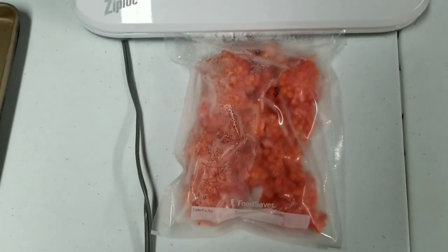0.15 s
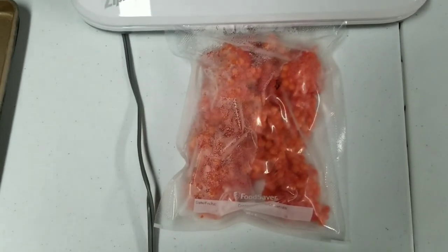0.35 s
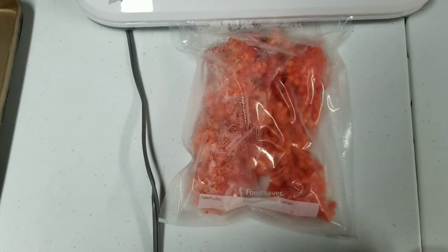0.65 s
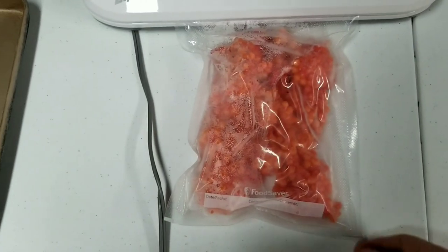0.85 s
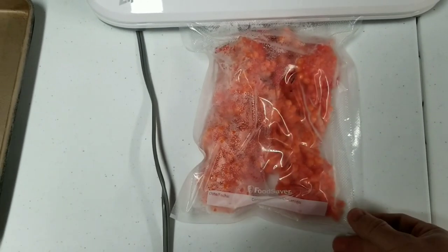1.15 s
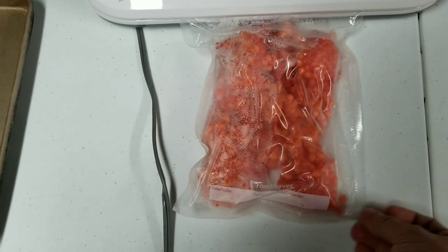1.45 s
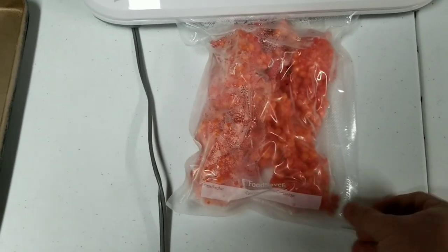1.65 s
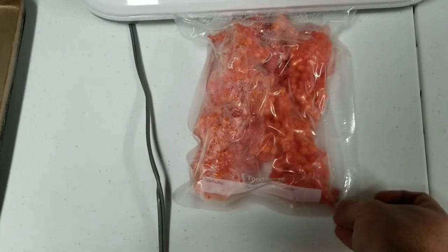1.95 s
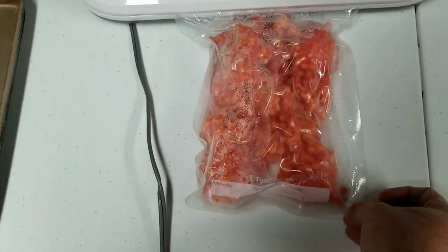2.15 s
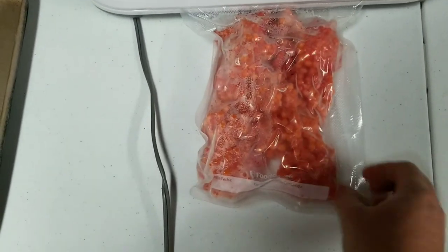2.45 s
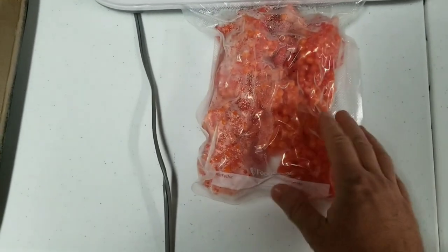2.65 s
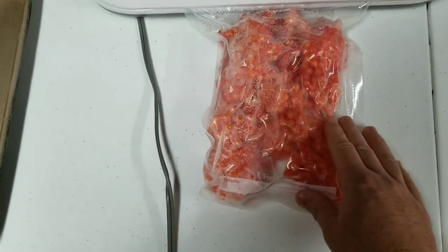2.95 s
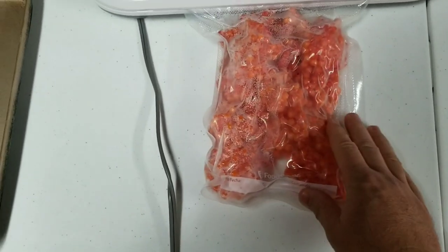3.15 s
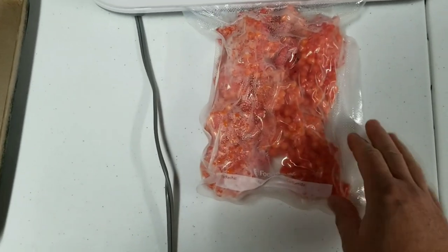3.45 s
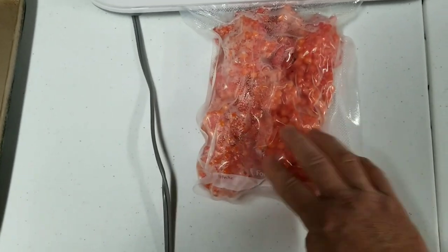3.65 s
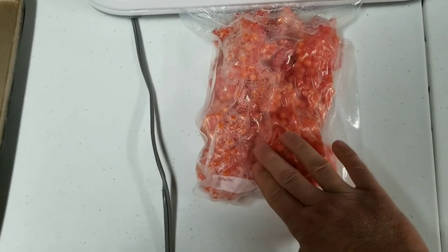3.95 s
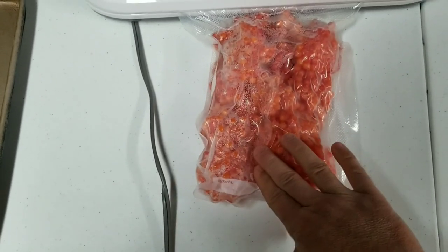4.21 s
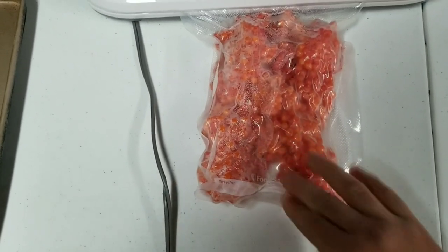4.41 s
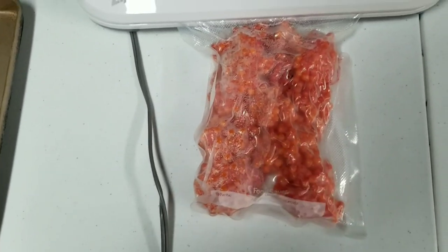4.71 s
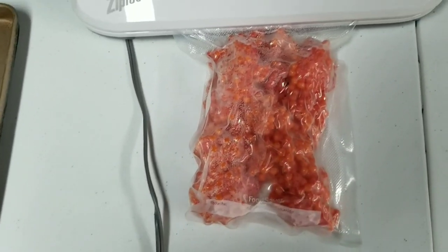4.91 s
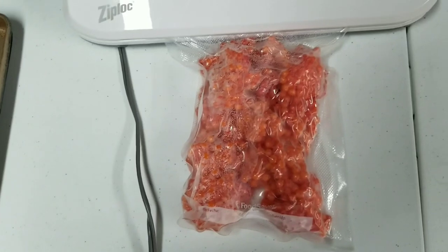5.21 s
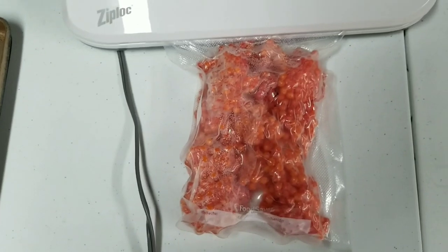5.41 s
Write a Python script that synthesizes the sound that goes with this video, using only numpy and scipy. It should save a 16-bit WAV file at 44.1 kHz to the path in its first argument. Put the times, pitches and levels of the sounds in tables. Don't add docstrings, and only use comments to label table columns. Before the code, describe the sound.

A small vacuum pump runs from start to finish on a kitchen counter, heard very close in stereo with slight short room echo. Its low buzzing hum, about 49 strokes per second, carries housing thump, valve knock, rattling panels and rough pulsing hiss. From 0.2 to 1.7 s the plastic bag gives loud dry snaps, strongest around 0.4-0.5 and 0.94 s, with low knocks of shifting contents near 0.46-0.64 s. The motor fades from about 1.3 s, quietest at 2-2.8 s, while fine crackles and ticks continue; a sharp snap comes at 3.07 s. It then strengthens, more rattly and laboured, sinking slightly in pitch until about 4.7 s. Snaps cluster at 4.34-4.7 s with a firm knock; another sharp snap at 5.12 s brings a tiny puff of air. The level dips briefly after big snaps. Pitch recovers a little and the hum softens, ending still running at 5.6 s.

```python
import sys
import numpy as np
from scipy import signal
from scipy.fft import rfft, irfft, next_fast_len
from scipy.io import wavfile
from scipy.ndimage import uniform_filter1d

SR = 44100
rng = np.random.default_rng(int(sys.argv[2]) if len(sys.argv) > 2 else 0)


def convert_level_to_amplitude(level_db):
    exponent = np.asarray(level_db, float) / 20
    return 10 ** exponent


def master(y):
    cut = np.clip(np.atleast_2d(y).T, -1, 1)
    pcm = np.round(cut * 32767)
    wavfile.write(sys.argv[1], SR, pcm.astype(np.int16))


N = 245637

# hz, likeness
LIKENESS = [(60, 1), (180, 0.29), (550, 0.02), (1650, 0.086), (4970, 0.01), (15000, 0.033)]
# hz, level_db
LEAN = [(60, -.2), (170, -.8), (350, -.7), (700, -1.5), (1400, -4.5), (2800, -3), (5600, -11), (9800, -4.5),
        (14000, -7)]
PORT_DB = -66
KITCHEN_T60_S, WALL_CUT_HZ = .3, 4000
STEADY_TOP_HZ, CRACK_TOP_HZ = 16050, 16900

# start_s, depth_db
DUCKS = [
    (.495, 4.5),
    (1.065, 1.5),
    (1.35, 1),
    (1.44, -1),
    (1.665, 1),
    (1.73, 1),
    (4.378, 2.5),
    (4.7, 2),
    (5.122, 4),
]
DUCK_S, RECOVER_S = 0.00099, 0.52

# time_s, strokes_per_s
SPEED = [(0, 49.16), (.4, 49.22), (.84, 49.14), (1.4, 49.17), (1.67, 49.1), (1.95, 48.96), (2.51, 48.48),
         (3.07, 47.97), (3.91, 47.285), (4.19, 46.95), (4.46, 46.18), (4.74, 46.01), (5.02, 46.01),
         (5.3, 46.4), (5.57, 46.4)]
# time_s, level_db
EFFORT = [(0, -23.5), (.4, -22.5), (1.3, -27), (2.0, -32.5), (2.81, -33), (2.89, -31), (4.0, -27),
          (5.05, -26.5), (5.57, -30.5)]
# time_s, grip_db
SEAL = [(0, 0), (.6, 1), (1.8, 3.5), (2.8, 3.5), (3.8, 3.5), (4.2, 2.5), (4.6, 3.5), (5.1, 2.5), (5.57, 2)]
LIGHT_DB = [-24, -30, 3.5, -6.5, 3, -5.5, -14, -12.5, -8, -7.5, -19.5, -14, -9, -18, -13, -26.5, -18, -21,
            -17, -16.5, -10.5, -13, -15.5, -9, -8, -8, -15, -22, -18, -22.5]
PULLING_DB = [-20, -19, 4.5, -19.5, 3, -8, -10, -16.5, -16.5, -21.5, -16, -19.5, -16.5, -11.5, -9, -29, -22,
              -16, -18, -16.5, -23, -8, -12.5, -11.5, -5.5, -12.5, -12.5, -12, -22, -24]
GRIPPING_DB = [-29, -22, 0.5, -18.5, 0.5, -10.5, -6, -31.5, -14, -25.5, -19, -10, -11.5, -24, -6, -23, -24,
               -17.5, -17, -26, -13, -16, -12, -15, -9.5, -11.5, -13.5, -17, -20, -31]
TIGHT_DB = [-22, -18, 3, -8.5, -1.5, -6.5, -5, -22, -6, -15.5, -19.5, -2.5, -4.5, -30, -15, -14, -28, -9.5,
            -10, -11, -10, -1, -3, -11, 0.5, -1, -1, -17, -12, -30]
STRAINING_DB = [-23.5, -19, 2, -3.5, 2, -7, -2.5, -17, -11, -10, -22, -21.5, -10, -36, -15.5, -19, -22, -15,
                -9, -7.5, -18, -5, -10, -10, -10, -4, -16, -13, -18, -24]
LABOURING_DB = [-21.5, -12.5, 5, 3, 0.5, -2, 0, -12.5, -8.5, -12.5, -22, -6, -16, -20.5, -14, -14, -20.5,
                -11, -4, 4, 3.5, -5, 5.5, -5, -3, 10, 4.5, 3, -5.5, -9.5]
LOADED_DB = [-19, -20, 1, 4.5, -1.5, -19, -6.5, -16, -30, -12, -19, -17.5, -20, -11, -21, -13, -7.5, -15,
             -13.5, -11, -4, -4.5, -7.5, -13, -8, -17, -9, -12, -8.5, -10]
SETTLED_DB = [-18, -26, -2, 3, 1.5, -14, -8, -21, -24, -15.5, -18, -24, -15, -11, -18, -22.5, -14, -20,
              -19.5, -13, -8, -7.5, -15, -11, -7, -7, -9.5, -24, -23, -16]
STAGE_S = [.7, 2.3, 2.85, 3.4, 3.85, 4.25, 4.7, 5.4]
THUMP_LAG_CYCLES = [.05, .01, .01, .01, -.03, -.06, -.07, -.07]
LID_LAG_CYCLES = [0.1214, 0.11, 0.11, 0.065, 0.06, 0.007, 0.0034, 0.005]
RETURN_TURN_CYCLES = [.6, .5, .2, 0, 0, 0, 0, 0]
SWELL_LAG_CYCLES = [0, .17, .1, .03, .06, .08, 0, 0]
# ring_hz, width_hz, level_db at four loads
PANELS = [(1526, 134, -26, -8, -3, -8), (1760, 69, -11, -13, -3.5, -4), (1924, 41, -16, -13, -5.5, -8),
          (2080, 20, -12, -18, -8, -12.5), (2308, 107, -6, -30, -7.5, -2), (2805, 105, -13.5, -4, 0, -6)]
PANEL_S = [.8, 2.4, 3.8, 4.8]
RUMBLE_DB = -29.5

# hz, level_db_per_hz
AIR = [(240, -42), (400, -8), (445, -16), (488, -11), (725, -8.5), (807, -15), (871, -15.5), (1220, -1),
       (1480, -6.5), (2770, -8.5), (3760, -13), (7470, -12), (9250, -19.5), (15300, -13.5)]
HISS_UNDER_DB = -11
LOW_AIR_LOSS_DB, LOW_AIR_FADE_S = 8, 4.5
# start_s, level_db, decay_s
PUFFS = [
    (5.132, -25.5, 0.039),
]
WHISTLE_HZ, WHISTLE_WANDER_HZ, WHISTLE_DB = 2845, 15, -15

# hz, level_db_per_hz
FILM = [(900, -35), (1500, -30), (2300, 6.5), (3700, 5), (5500, 6), (7450, 10), (9300, -9), (12000, -3.5),
        (15000, -1), (16500, -18)]
# time_s, busy_db
CRACKLE = [(0, 6.5), (.7, 0.5), (1.3, 2.5), (1.8, -14), (2.3, 1.5), (3.3, 1.5), (4.0, -2.5), (4.8, 0.5),
           (5.25, -23.5), (5.57, 6)]
GRAINS_PER_S, CRACKLE_DB, RATE_FOLLOWS = 420, -45.5, 0.37
# start_s, peak_db, ring_hz, left_minus_right_db
SNAPS = [(.1984, -9.5, 2440, -11), (.4018, -4, 7500, -19), (.4584, -4.5, 2200, -17),
         (.5039, -4.5, 5240, -14), (.9401, -3, 4930, -14.5), (1.0635, -7.5, 3470, -17),
         (1.3478, -6, 5300, -11), (1.3951, -7, 8360, -13), (1.4432, -4.5, 4500, -10),
         (1.716, -8, 6400, -17), (2.12, -10.5, 6040, -34), (2.3955, -9.5, 4500, -9),
         (2.4495, -10, 5800, -17), (2.568, -7.5, 5530, -15), (2.7867, -7, 6160, -14),
         (2.9544, -8.5, 5400, -15), (2.9895, -8.5, 7600, -21), (3.0671, -3.5, 7900, -17),
         (3.192, -7.5, 2430, -27), (3.2809, -11, 8100, -13), (3.3312, -8.5, 4900, -16),
         (3.8591, -9.5, 6750, -17), (4.3452, -6, 3260, -8), (4.375, -7.5, 6300, -21),
         (4.577, -7.5, 3150, -16), (4.6406, -7, 5800, -18), (4.7042, -7, 7550, -14),
         (5.0466, -8.5, 6600, -21), (5.1235, -3.5, 5600, -25), (5.4121, -10, 6200, -17)]
# start_s, peak_db, ring_hz
CREASES = [(0.491, -14, 1830), (.64, -8.5, 5240), (1.0254, -12, 2090), (1.1595, -13, 4930),
           (1.25, -12, 6200), (1.287, -13, 5700), (1.499, -18, 6440), (1.6, -13, 7340),
           (1.6619, -8.5, 2080), (2.262, -12, 2330), (1.9865, -14, 6400), (2.054, -15.5, 4860),
           (2.253, -11, 6500), (2.51, -21, 1760), (2.638, -12, 1670), (2.717, -18, 5540),
           (3.009, -14, 5530), (3.0203, -11.5, 6030), (3.042, -12, 6660), (4.336, -14, 5500),
           (4.3737, -6, 5100), (3.2112, -9.5, 7400), (3.455, -11, 7250), (3.6433, -16, 7700),
           (3.681, -14.5, 2170), (3.917, -9, 6400), (4.0177, -18, 2080), (4.4603, -13, 2700),
           (5.028, -12, 3200), (5.312, -16, 7660), (5.354, -14.5, 7060)]
# start_s, peak_db, ring_hz
MORE_CREASES = [(0.168, -19, 4900), (0.41, -18, 2400), (0.5222, -15, 7500), (0.5923, -9.5, 2400),
                (0.7132, -22, 5800), (0.7288, -16, 4700), (0.7896, -29, 7700), (0.8077, -19, 7300),
                (0.8735, -19, 6100), (0.903, -18.5, 6600), (0.911, -18, 2590), (0.9482, -17, 5700),
                (1.021, -14.5, 5800), (1.1413, -29, 6500), (1.174, -24, 5500), (1.2085, -16, 7060),
                (1.261, -31, 6500), (1.272, -20, 1800), (1.3415, -14, 5000), (1.3807, -19, 6900),
                (1.5383, -23, 6600), (1.727, -12, 5240), (1.7834, -19.5, 4700), (1.802, -21, 1830),
                (1.9147, -31, 6200), (1.919, -20, 5240), (1.956, -27, 7100), (2.1305, -16.5, 4520),
                (2.18, -19, 5000), (2.2082, -23, 5000), (2.2123, -29, 4800), (2.28, -20, 1900),
                (2.327, -23, 5600), (2.359, -26, 7700), (2.381, -31, 2900), (2.4274, -25, 5000),
                (2.4346, -26, 3100), (2.4916, -21, 5700), (2.5191, -21, 2900), (2.5355, -20, 4700),
                (2.593, -26, 5700), (2.628, -19, 7500), (2.65, -19.5, 2600), (2.6555, -18.5, 6900),
                (2.7002, -26, 6900), (2.7262, -16, 7000), (2.734, -18.5, 4900), (2.7393, -18, 2300),
                (2.806, -16, 6200), (2.8259, -22, 5900), (2.846, -22, 6100), (2.898, -19, 7400),
                (2.9046, -20, 7000), (2.9095, -18, 5800), (2.9626, -16, 5900), (2.9689, -26, 7300),
                (3.004, -29, 7100), (3.0601, -24, 5600), (3.071, -21.0, 6100), (3.0762, -17, 2800),
                (3.0853, -29, 7100), (3.132, -12.5, 4800), (3.1397, -19, 5000), (3.166, -18, 5200),
                   (3.18, -15, 2600), (3.2057, -20, 4800), (3.2163, -24.0, 6700), (3.222, -19, 3100),
                   (3.2322, -24.0, 5800), (3.2719, -30, 6500), (3.3079, -18, 5400), (3.316, -20, 5100),
                   (3.3247, -25, 1900), (3.3347, -24, 6600), (3.3757, -19, 7400), (3.3903, -19, 7400),
                   (3.4111, -14, 7100), (3.477, -17, 7000), (3.4927, -16, 6600), (3.5413, -18, 7100),
                   (3.5564, -23, 5300), (3.66, -14, 7100), (3.665, -14, 2000), (3.675, -15, 1900),
                   (3.6987, -14, 7600), (3.734, -22.0, 7700), (3.7794, -19, 5300), (3.795, -17, 7500),
                   (3.8085, -22, 2980), (3.849, -23, 7600), (3.9279, -18, 5600), (3.9621, -17, 7940),
                   (4.0316, -16, 5500), (4.0404, -15.5, 7600), (4.134, -18.0, 6900), (4.1644, -14, 7500),
                   (4.2413, -19, 5500), (4.3519, -10.5, 5100), (4.4757, -11.5, 3930), (4.4873, -32, 5600),
                   (4.5413, -14.5, 7500), (4.601, -20, 6200), (4.607, -16, 6600), (4.6575, -19, 7000),
                   (4.749, -16.5, 6000), (4.757, -16, 6500), (4.7723, -16, 7300), (4.782, -20, 7800),
                   (4.834, -21, 7200), (4.8503, -29, 4900), (4.879, -32, 7500), (4.972, -24, 12300),
                   (5.0551, -16, 7300), (5.135, -27, 5700), (5.179, -19.0, 5200), (5.2084, -19, 6700),
                   (5.2667, -32, 2100), (5.3848, -19, 7100), (5.4587, -27, 6300), (5.474, -20.5, 7400)]
CREASE_PAN_DB = -14
KNOCK_DB, KNOCK_LOSS_DB_PER_S = -7.5, 0
# start_s, peak_db, left_minus_right_db
SPITS = [(0.4015, -18, -2), (0.4903, -25, -7.5), (0.6399, -27, -6.0), (0.9393, -22, -2.0),
         (1.0191, -21, -5.0), (1.286, -20, -3), (1.3942, -20, -5.0), (1.4421, -12, -11), (1.7165, -16, -1),
         (2.0537, -21, -4.0), (2.1196, -22, -3), (2.2528, -24, -7.0), (2.3955, -20, -13.5),
         (2.5676, -33, 4), (2.6998, -22, -3), (2.7876, -18, -3), (2.9537, -18, -1), (2.9891, -12, -8.5),
         (3.0664, -19, -6.0), (3.1313, -24, -7.0), (3.1911, -20, -7.5), (3.2804, -15.5, -3),
         (3.454, -25, -8), (3.6421, -25, -9.0), (3.6591, -16, -9.0), (3.8072, -20, -6), (3.8492, -14, -7.5),
         (4.0173, -15, -1), (4.1335, -23, -2), (4.3445, -20, -5.5), (4.375, -10, -9), (4.4458, -29, -6),
         (4.4603, -16, -5), (4.7032, -14, 0), (4.8344, -24, 2), (4.9731, -14, -8.5), (5.1223, -26, -7.0),
         (5.1781, -27, -4), (5.2664, -23, -16), (5.3118, -21, -11.0), (5.3522, -28, -6.0),
         (5.4116, -25, -3), (5.473, -27, -8.5), (5.5553, -22, -5.5)]
# start_s, peak_db, ring_hz
SHIFTS = [
    (0.46, -16, 1460),
    (0.592, -17, 1300),
    (0.641, -14, 1250),
    (2.055, -18.5, 1200),
    (2.281, -20, 1520),
    (2.656, -28, 1320),
    (2.739, -30, 1520),
    (4.344, -19.5, 1380),
    (4.706, -14.5, 1390),
]
SHIFT_WIDTH_HZ = 140


def rms_one(x):
    return x / np.sqrt(np.mean(x ** 2) + 1e-20)


def in_time(rows):
    time_s, *columns = np.transpose(rows)
    return [np.interp(np.arange(N) / SR, time_s, c) for c in columns]


def at_hz(points, hz):
    hz_points, values = np.transpose(points)
    return np.interp(np.log(np.maximum(hz, 1)), np.log(np.maximum(hz_points, 1)), values)


def drift(rate_hz):
    r = np.exp(-80 * np.pi * rate_hz / SR)
    white = rng.standard_normal(N // 40 + 2002)
    slow = signal.lfilter([1], [1, -2 * r, r * r], white)[2000:]
    return np.interp(np.arange(N) / 40, np.arange(len(slow)), rms_one(slow))


def resonate(x, hz, width_hz):
    r, w = np.exp(-np.pi * width_hz / SR), 2 * np.pi * hz / SR
    return signal.lfilter([0, np.sin(w)], [1, -2 * r * np.cos(w), r * r], x + 1e-18)


def colour(x, spectrum, share=1):
    size = next_fast_len(x.shape[-1])
    gain = convert_level_to_amplitude(share * at_hz(spectrum, np.fft.rfftfreq(size, 1 / SR)))
    return irfft(rfft(x, size) * gain, size)[..., :x.shape[-1]]


def band_pass(x, order, low_hz, high_hz):
    return signal.sosfilt(signal.butter(order, [low_hz, high_hz], "band", fs=SR, output="sos"), x)


def sides(x):
    return np.array([colour(x[0], LEAN, share=.5), colour(x[-1], LEAN, share=-.5)])


def ducking():
    gain_db = 0
    for start_s, depth_db in DUCKS:
        since_s = np.maximum(np.arange(N) / SR - start_s, 0)
        gain_db = gain_db - depth_db * (1 - np.exp(-since_s / DUCK_S)) * np.exp(-since_s / RECOVER_S)
    return gain_db


def ports():
    return convert_level_to_amplitude(PORT_DB) * rms_one(band_pass(rng.standard_normal((2, N)), 2, 22, 80))


def kitchen(x):
    size = next_fast_len(N + SR)
    hz, out = np.fft.rfftfreq(size, 1 / SR), np.zeros((2, size // 2 + 1), complex)
    for k, lag_s in enumerate(rng.uniform(.006, .03, 16)):
        loss = convert_level_to_amplitude(-60 * lag_s / KITCHEN_T60_S) / (1 + 1j * hz / WALL_CUT_HZ)
        echo = loss * np.exp(-2j * np.pi * hz * lag_s)
        out[k % 2] += echo / (1 - echo) * (-1) ** (k // 2)
    return irfft(out * rfft(x, size), size)[:, :N]


def rumble(thump_db):
    mid, side = band_pass(rng.standard_normal((2, N)), 3, 84, 340)
    return convert_level_to_amplitude(thump_db + RUMBLE_DB + 10.5) * rms_one(mid + 0.043 * side * [[1], [-1]])


def air(turns, hiss_db, patchy_db, puff):
    out, together, edges_hz = 0, drift(140), 40 * 2 ** np.arange(2, 9.1, .5)
    white = rng.standard_normal((2, 2, N))
    low_db = 1.0 - LOW_AIR_LOSS_DB * (1 - np.exp(-np.arange(N) / SR / LOW_AIR_FADE_S))
    for k, (low_hz, high_hz) in enumerate(zip(edges_hz, edges_hz[1:])):
        is_low = high_hz < 2600
        mid, side = band_pass(white[k % 2], 2, low_hz, high_hz)
        alike = np.clip(at_hz(LIKENESS, np.sqrt(low_hz * high_hz)), -1, 1)
        gain = convert_level_to_amplitude(patchy_db * (0.6 if is_low else 1) * (1.72 * together + drift(4.3)))
        gain = gain * convert_level_to_amplitude(low_db if is_low else 0)
        out = out + gain * (np.sqrt(1 + alike) * mid + np.sqrt(1 - alike) * side * [[1], [-1]])
    stroke = 1 + puff * np.exp(-(turns % 1) / 0.25)
    return convert_level_to_amplitude(hiss_db + 1.0) * stroke * rms_one(colour(out, AIR))


def puffs():
    t = np.arange(N) / SR
    swell = sum(convert_level_to_amplitude(db) * (t > s) * np.exp(-np.abs(t - s) / decay_s) for s, db, decay_s in PUFFS)
    return swell * rms_one(band_pass(rng.standard_normal((2, N)), 3, 4600, 7400))


def whistle(knock_db):
    turns = np.cumsum(WHISTLE_HZ + WHISTLE_WANDER_HZ * drift(24)) / SR
    load_db = np.interp(np.arange(N) / SR, PANEL_S, PANELS[-1][2:])
    return convert_level_to_amplitude(knock_db + WHISTLE_DB + load_db + 2.8 * drift(6)) * np.cos(2 * np.pi * turns)


def shifts():
    out = 0
    for start_s, peak_db, ring_hz in SHIFTS:
        click = 1. * (np.arange(N) == round(start_s * SR))
        out = out + convert_level_to_amplitude(peak_db) * resonate(click, ring_hz, SHIFT_WIDTH_HZ)
    return out


def crackle():
    busy_db, = in_time(CRACKLE)
    per_s, level_db = GRAINS_PER_S * convert_level_to_amplitude(RATE_FOLLOWS * busy_db), CRACKLE_DB + busy_db
    sizes = convert_level_to_amplitude(6.7 * np.minimum(rng.exponential(1, N), 2.2)) * rng.choice([-1, 1], N)
    ticks = sizes * (rng.random(N) < per_s * convert_level_to_amplitude(4 * drift(18)) / SR)
    rings_hz, dealt = np.geomspace(1800, 15500, 12), rng.integers(0, 12, N)
    pops = sum(resonate(ticks * (dealt == k), hz, hz / 16.0) for k, hz in enumerate(rings_hz))
    return convert_level_to_amplitude(level_db - 0.5) * rms_one(colour(pops + 0.24 * ticks, FILM))


def peak_one(x):
    return x / np.abs(x).max(axis=1, keepdims=True)


def spits():
    t = np.arange(-100, 200) / SR
    shape = np.exp(np.where(t < 0, t / 0.00035, -t / 0.00044))
    bursts = band_pass(shape * rng.standard_normal((len(SPITS), 2, 300)), 3, 9800, 17000)
    out = np.zeros((2, N + 400))
    for (start_s, peak_db, pan_db), burst in zip(SPITS, bursts):
        at = round(start_s * SR) + 40
        level = convert_level_to_amplitude(peak_db + 3.5 + np.array([[pan_db], [0]]))
        out[:, at:at + 300] += level * peak_one(burst)
    return out[:, 100:N + 100]


def snap_shape(t):
    spike = np.exp(-((t - .0028) / .00035) ** 2)
    t = t - .0024
    return 1.3 * spike + 2.9 * np.exp(np.where(t < 0, t / 0.00073, -t / 0.0021))


def snaps():
    size, lead = 900, round(.002 * SR)
    out, shape = np.zeros((2, N + size)), snap_shape(np.arange(size) / SR)
    folds = SNAPS + [(*row, CREASE_PAN_DB) for row in CREASES + MORE_CREASES]
    noise = rng.standard_normal((len(folds), 2, size))
    crack = 7.1 * (np.arange(size) == lead + 32)
    for (start_s, peak_db, ring_hz, pan_db), (own, far) in zip(folds, noise):
        own = own + crack
        burst = shape * [0.28 * own + 0.99 * far, own]
        ring = band_pass(burst, 2, ring_hz / 1.334, ring_hz * 1.19)
        bright = colour(burst, FILM) + convert_level_to_amplitude(6.0) * (5000 / ring_hz) ** 0.84 * ring
        bright[0] = colour(bright[0], LEAN)
        knock = band_pass(burst, 2, 850, 2100)
        low_db = KNOCK_DB - KNOCK_LOSS_DB_PER_S * start_s
        snap = peak_one(bright) + convert_level_to_amplitude(low_db - 9.0) * peak_one(knock)
        at = round(start_s * SR) - lead
        out[:, at:at + size] += convert_level_to_amplitude(peak_db + 6.5 + np.array([[pan_db], [0]])) * snap
    return out[:, :N]


def panels(turns, knock_db):
    strokes = np.diff(np.floor(turns), prepend=np.floor(turns[0]))
    clicks = strokes * convert_level_to_amplitude(knock_db - 4.5 + 0.83 * rng.standard_normal(N))
    back = 1 + 1.1 * np.cos(2 * np.pi * (turns - .4))
    chatter = convert_level_to_amplitude(knock_db - 33.5) * back * rng.standard_normal(N)
    t, out = np.arange(N) / SR, 0
    for k, (ring_hz, width_hz, *levels_db) in enumerate(PANELS):
        drive = clicks + 0.23 * chatter if k + 1 < len(PANELS) else chatter
        gain = (-1) ** k * convert_level_to_amplitude(8.5 + np.interp(t, PANEL_S, levels_db))
        out = out + gain * resonate(drive, ring_hz, width_hz)
    return out


def causal_phase(levels_db):
    log_gain = np.interp(np.arange(65), np.arange(32), np.r_[-30, levels_db, -30]) * np.log(10) / 20
    cepstrum = irfft(log_gain)
    cepstrum[1:64] *= 2
    cepstrum[65:] = 0
    return rfft(cepstrum).imag[1:31]


def even(x):
    return x / np.sqrt(uniform_filter1d(x ** 2, size=SR // 6))


def housing(turns, thump_db, knock_db):
    stages_db = np.array([LIGHT_DB, PULLING_DB, GRIPPING_DB, TIGHT_DB,
                          STRAINING_DB, LABOURING_DB, LOADED_DB, SETTLED_DB])
    phases, t = np.array([causal_phase(s) for s in stages_db]), np.arange(N) / SR
    thump, knock, lid_from, valve_from = 0, 0, 7, 17
    base_lag, lid_lag = np.interp(t, STAGE_S, THUMP_LAG_CYCLES), np.interp(t, STAGE_S, LID_LAG_CYCLES)
    for k in range(30):
        level_db = np.interp(t, STAGE_S, stages_db[:, k]) + 0.96 * drift(2.9)
        phase, lag = np.interp(t, STAGE_S, phases[:, k]), 0
        if k < lid_from:
            lag = base_lag
            turn = np.interp(t, STAGE_S, RETURN_TURN_CYCLES) * (k % 2)
            turn = turn - np.interp(t, STAGE_S, SWELL_LAG_CYCLES) * (k - 3)
            phase = phase + 2 * np.pi * turn
        elif k < valve_from:
            lag = lid_lag
            phase = phase - 0.13 * (k - 11) ** 2
        tone = convert_level_to_amplitude(level_db) * np.cos(2 * np.pi * (k + 1) * (turns - lag) + phase)
        if k < valve_from:
            thump = thump + tone
        else:
            knock = knock + tone
    return convert_level_to_amplitude(thump_db + 0.95) * even(thump) + convert_level_to_amplitude(knock_db - 1.6) * even(knock)


def late(x, samples):
    return np.array([x, np.roll(x, samples)])


def scene():
    (strokes_per_s,), (effort_db,), (seal_db,) = in_time(SPEED), in_time(EFFORT), in_time(SEAL)
    thump_db = effort_db + ducking()
    knock_db, hiss_db = thump_db - seal_db, thump_db + HISS_UNDER_DB + seal_db
    turns = .98 + np.cumsum(strokes_per_s * (1 + .0008 * drift(8.0))) / SR
    body, rattle = housing(turns, thump_db, knock_db), panels(turns, knock_db)
    fizz, bag = crackle(), snaps()
    close = late(body, 1) + late(rattle + shifts(), -5) + late(fizz, -7)
    above_base = signal.butter(2, 260, "high", fs=SR, output="sos")
    room = convert_level_to_amplitude(-16.5) * kitchen(rattle + fizz + bag[1])
    room = room + convert_level_to_amplitude(-19.0) * kitchen(signal.sosfilt(above_base, body))
    hiss = air(turns, hiss_db, patchy_db=1.56, puff=0.83) + puffs() + rumble(thump_db) + whistle(knock_db)
    top = signal.cheby2(16, 70, STEADY_TOP_HZ, fs=SR, output="sos")
    return signal.sosfilt(top, sides(close + hiss) + room + ports() + bag) + spits()


def roll_off(x):
    return signal.sosfilt(signal.butter(12, 16790, fs=SR, output="sos"), x)


def record(dry):
    top = signal.cheby2(16, 70, CRACK_TOP_HZ, fs=SR, output="sos")
    mix = signal.sosfilt(top, 1.089 * np.tanh(dry / 1.111))
    return roll_off(mix)


dry = scene()
out = record(dry)
master(out)
```